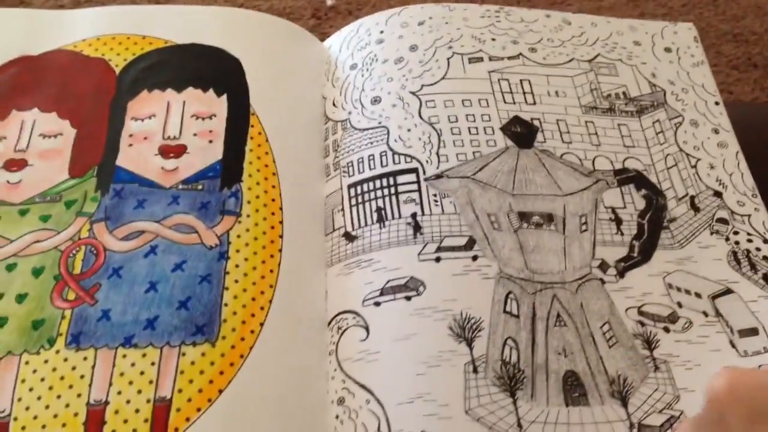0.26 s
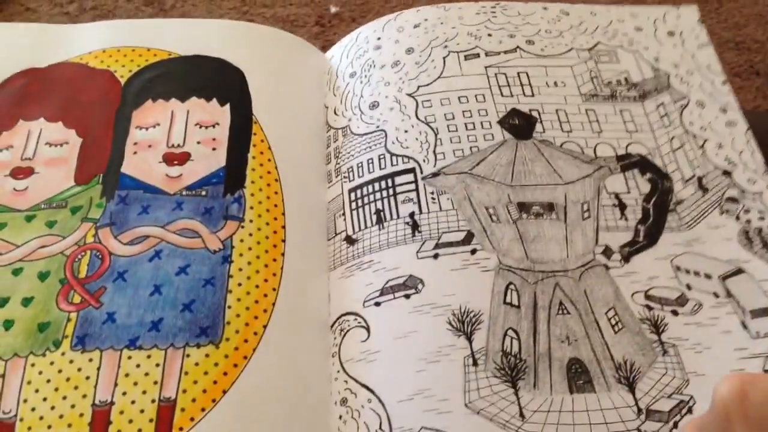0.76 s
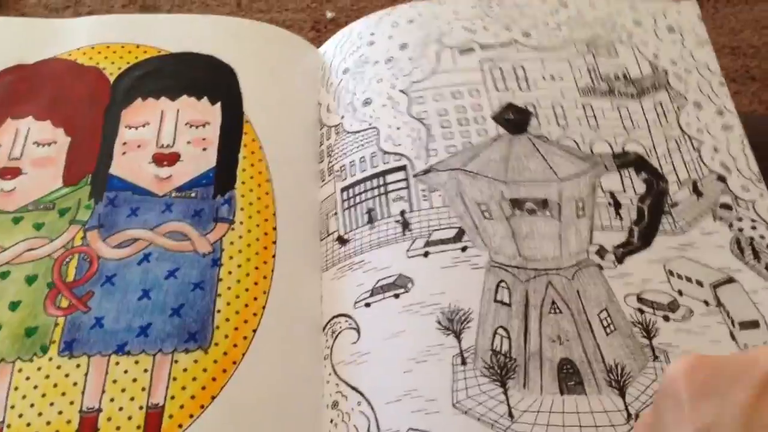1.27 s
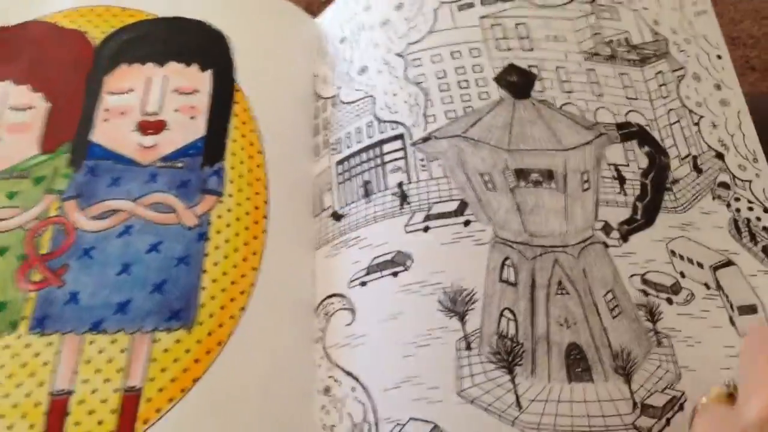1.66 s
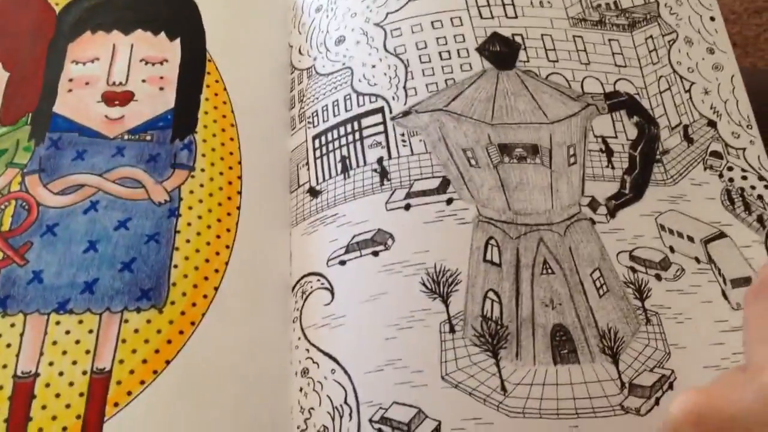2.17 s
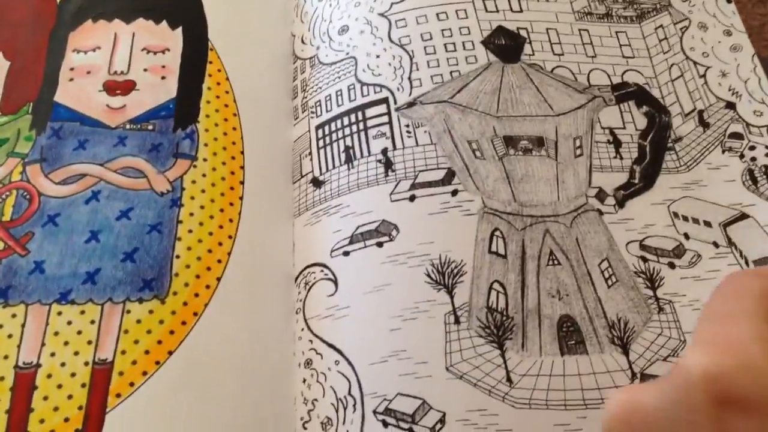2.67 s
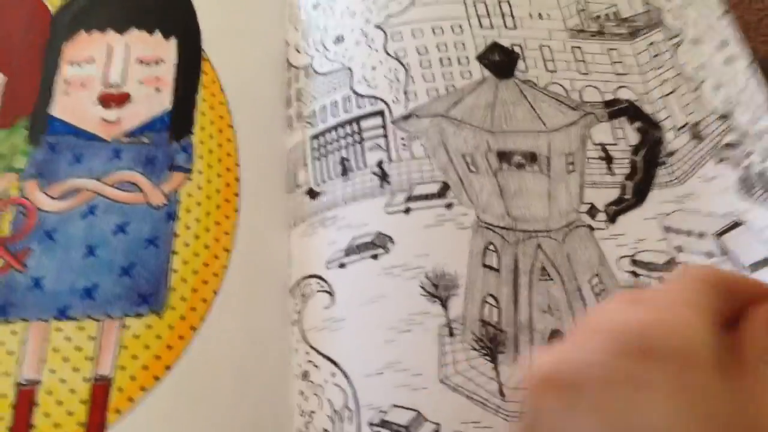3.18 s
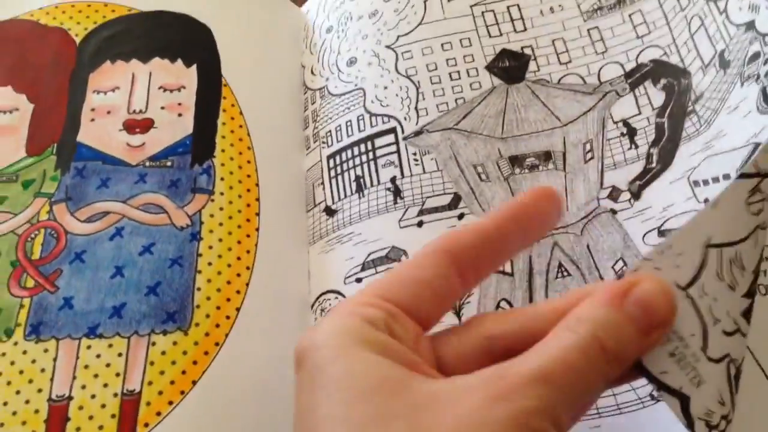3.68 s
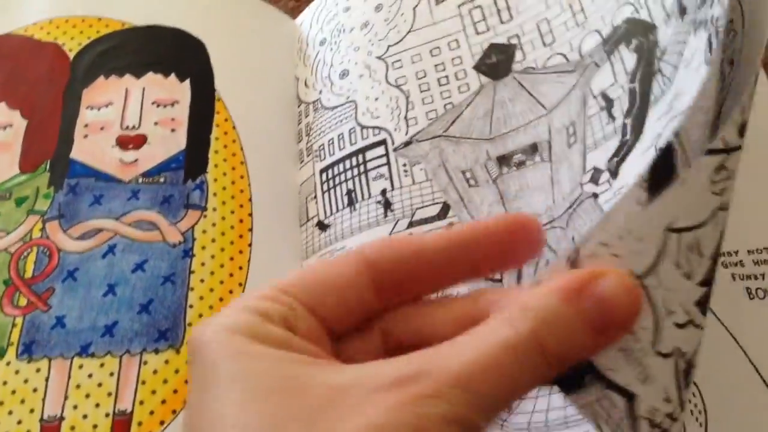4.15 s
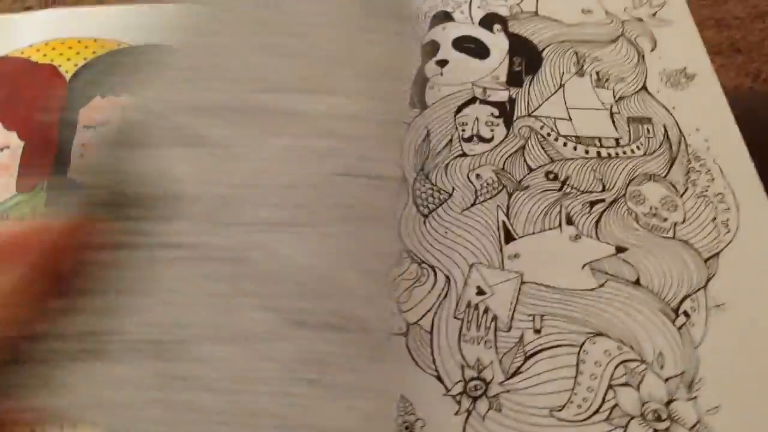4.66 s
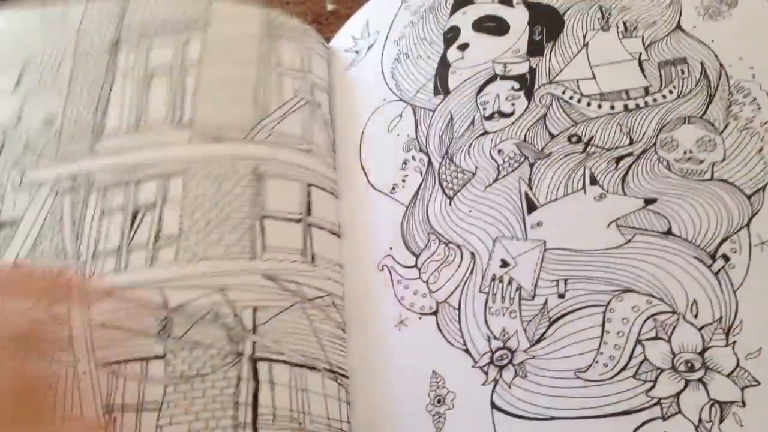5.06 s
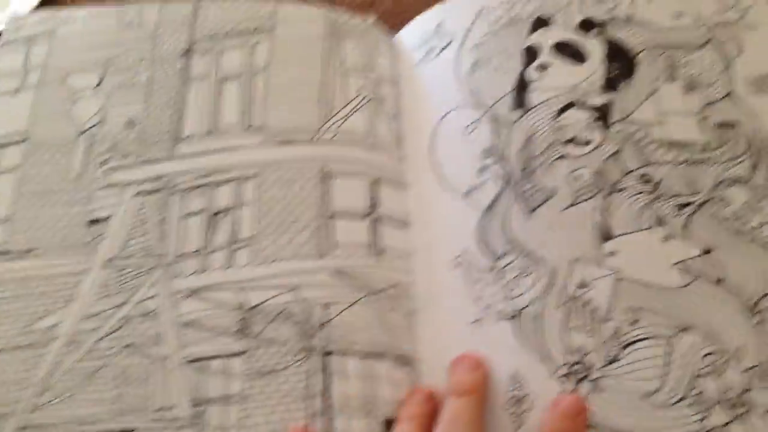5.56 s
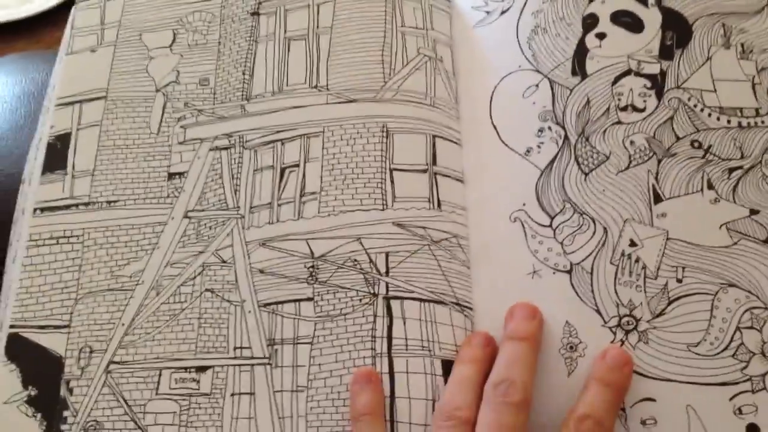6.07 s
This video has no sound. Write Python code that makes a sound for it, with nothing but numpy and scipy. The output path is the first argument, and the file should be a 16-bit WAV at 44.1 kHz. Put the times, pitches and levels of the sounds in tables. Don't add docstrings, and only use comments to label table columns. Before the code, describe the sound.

A large book handled close to a small microphone on a table in a quiet, lightly reflective room with low rumble, gentle hiss and a barely audible high whine. From 0.2 s stiff page edges snap from a thumb, faint and quick at first, swelling to separate crisp pops around 0.5-0.8 s, then fading by 1.05 s. From 1.2 to 2 s the hand shifts with small scrapes, a dull bump near 1.45 and three light snaps at 2.0. Bright corner picks tick at 2.35-2.75, then a strong pop at 2.84. Scrapes and a snap come near 3.2, soft flexing follows, and the sharpest peeling pop hits at 3.78. At 4.1-4.5 the page swings over in a dense crackle, swish and papery flutter. Afterwards only soft smoothing, a few ticks around 5.15 and 5.35, a faint knock at 5.67, a last tiny scrape at 6.08, and a distant low motor hum slowly swelling.

```python
import sys
import numpy as np
from scipy import signal
from scipy.fft import rfft, irfft
from scipy.io import wavfile
from scipy.ndimage import uniform_filter1d

SR = 44100
rng = np.random.default_rng(int(sys.argv[2]) if len(sys.argv) > 2 else 0)


def gain_from_db(level_db):
    decades = np.asarray(level_db, float) / 20
    return 10 ** decades


def unload_audio(sound):
    columns = np.transpose(np.atleast_2d(sound))
    steps = np.round(np.clip(columns, -1, 1) * 32767)
    wavfile.write(sys.argv[1], SR, steps.astype(np.int16))


N = 279153

# pitch_hz, width_hz, level_db
PAGE_MODES = [(776, 750, -0.5), (1480, 110, -0.5), (1960, 333, -0.5), (2570, 800, -2.5), (3900, 2800, 4),
              (6040, 1800, 0)]

# start_s, peak_db, ring_hz, edge_db
RIFFLE_SNAPS = [(0.035, -61, 515, -23), (0.22, -41, 2840, -25), (0.247, -34, 1920, -8),
                (0.273, -31.5, 720, -8.5), (0.2993, -24.5, 910, -21.5), (0.33, -21.5, 1430, -12),
                (0.365, -19.5, 1020, -6), (0.416, -16.5, 2850, -8), (0.5146, -13, 970, -10),
                (0.6257, -12.5, 2940, -8), (0.745, -11.5, 2700, -8), (0.7903, -15.5, 1400, -5.5),
                (0.852, -17.5, 1050, -6), (0.881, -22, 2690, -3.5), (0.913, -24.5, 3320, -2),
                (1.016, -29.5, 1360, -10), (1.055, -43, 3240, -1)]
# start_s, peak_db, ring_hz, edge_db
REGRIP_SNAPS = [(1.186, -45, 726, -11), (1.208, -44.5, 2660, 0), (1.217, -41.5, 790, -4),
                (1.257, -52.5, 1270, -9), (1.417, -39.5, 1500, -2), (1.4503, -51, 566, 8),
                (1.637, -42, 4030, -3), (1.859, -52, 2950, 11), (1.914, -45, 3800, 1),
                (2.0036, -30, 1530, -4), (2.032, -30, 1540, -4), (2.059, -30, 3560, -2)]
# start_s, peak_db, ring_hz, edge_db
PICK_SNAPS = [
    (2.249, -44.5, 3700, 5),
    (2.355, -31.5, 1330, -2.5),
    (2.392, -26.5, 4070, -4),
    (2.4583, -28.5, 3900, -1.5),
    (2.568, -49.5, 3880, -0.5),
    (2.62, -29, 3900, -1),
    (2.732, -31.5, 1780, -9.5),
    (2.741, -30, 1230, -17),
]
# start_s, peak_db, ring_hz, edge_db
LIFT_SNAPS = [ (2.843, -15.5, 1020, -5.5), (3.143, -52, 3380, 2), (3.157, -48, 2650, 6.5),
              (3.1768, -25.5, 1630, -1), (3.311, -48, 2960, -13), (3.555, -44.5, 1360, -28),
              (3.609, -39.5, 1630, -41), (3.631, -39, 2300, -38), (3.699, -33, 1510, -42),
              (3.708, -32, 1740, -39), (3.7824, -12, 865, -7.5), (3.874, -32.5, 1540, -3),
              (3.878, -23, 1650, -8), (3.966, -28.5, 1540, -25)]
# start_s, peak_db, ring_hz, edge_db
TURN_SNAPS = [(4.171, -26.5, 3130, -0.5), (4.189, -31, 4270, 3), (4.273, -19.5, 1350, -36),
              (4.286, -34, 1480, -13), (4.313, -30, 710, -32), (4.345, -33, 1080, -20),
              (4.373, -26, 1430, -5.5), (4.3975, -24, 1550, -6), (4.442, -42, 3300, -22),
              (5.143, -64, 3560, -10), (5.162, -44, 1350, -8), (5.17, -59, 1790, -16),
              (5.349, -50, 2220, -1.5), (5.371, -47, 530, -5.5), (5.672, -43, 774, -5),
              (6.058, -56, 880, -16), (6.073, -44.5, 860, -5)]

# pitch_hz, width_hz, level_db
STACK_RINGS = [(1530, 260, -3), (1920, 200, 0), (2800, 250, 2), (3820, 310, 5.5)]
CORNER_RINGS = [(1900, 200, 2), (2400, 76, 17.5), (3220, 210, 11), (3900, 220, 29)]
PEELED_RINGS = [(820, 270, 1.7), (1740, 360, 8.5), (2285, 127, 9), (3400, 520, 3.6)]
BENT_RINGS = [(1400, 130, -6), (1930, 300, -32), (3100, 92, -8), (4220, 390, -16)]

# snaps, rings, thump_db under a middling snap, ring_ms, lowest_hz, spike_db
GESTURES = [
    (RIFFLE_SNAPS, STACK_RINGS, -24, 18.4, 180, -11.5),
    (REGRIP_SNAPS, STACK_RINGS, -24.5, 17.3, 140, 0.85),
    (PICK_SNAPS, CORNER_RINGS, -32, 24.5, 890, -9.5),
    (LIFT_SNAPS, PEELED_RINGS, -32, 20.5, 550, -11.5),
    (TURN_SNAPS, BENT_RINGS, -26, 25.3, 230, -27)]

# start_s, peak_db, centre_hz, treble_db, length_ms
SEEKING_SCRAPES = [(0.395, -37, 1360, -25, 22), (0.397, -46, 4200, -20, 16), (0.446, -51, 3220, -25, 34),
                   (0.47, -51, 2600, -15, 46), (0.715, -51, 1470, -5, 30), (1.422, -36, 1960, 13, 17),
                   (1.514, -51, 1450, -12, 32), (1.607, -43, 4000, 5, 85), (1.642, -44, 2800, -15, 46),
                   (1.741, -44, 3700, 9.5, 40), (1.764, -49, 3570, -12, 28), (1.847, -42.5, 3880, -27, 36),
                   (1.927, -40.5, 4620, -8, 9.3), (3.181, -30.5, 1480, 9, 30.5),
                   (3.249, -51.5, 2570, 3, 120), (3.27, -53, 3900, 11, 33), (3.385, -47, 3180, 0, 43),
                   (3.41, -41.5, 4360, 9, 22), (3.505, -48.5, 7000, 13, 26), (3.47, -56, 4300, 5, 25),
                   (1.873, -50, 4500, 3, 18), (1.78, -51, 4200, 5, 30), (3.512, -49, 2940, -19, 14),
                   (3.585, -43.5, 1610, 0, 31)]
# start_s, peak_db, centre_hz, treble_db, length_ms
SWINGING_SCRAPES = [(4.091, -31.5, 3050, 2, 42), (4.19, -25, 4400, -1, 30), (4.214, -36, 3100, -19, 115),
                    (4.244, -32, 4070, -12, 53), (4.293, -32.5, 4600, 12, 36),
                    (4.403, -37.5, 3100, -20, 54), (4.422, -34, 3300, -8, 19), (4.499, -61, 3800, -20, 33),
                    (4.748, -53, 2140, -19, 67), (4.93, -49.5, 4100, 2, 60), (5.02, -52.5, 2800, 7, 97),
                    (5.38, -50, 4020, -8, 30), (6.081, -49, 3800, 14.5, 40)]
# start_s, peak_db, centre_hz, treble_db, length_ms
RUFFLES = [(.5955, -30, 1100, -15, 3.7), (3.172, -40, 2600, -5, 5), (2.057, -43, 3000, -10, 3),
           (0.482, -56, 3260, -9, 7.6), (1.03, -29, 2200, -8, 6.1), (2.255, -34.5, 3870, -3, 8.8),
           (2.354, -34, 1240, 5.5, 15), (2.3955, -33, 3900, -9, 6.5), (2.4665, -30.5, 3600, -4, 7.6),
           (2.624, -29.5, 2400, -2, 8.5), (2.737, -31, 1200, 4, 5.9), (3.102, -42, 2650, -1, 13),
           (3.607, -34, 1620, 5.5, 10.6), (3.644, -36.5, 2300, -16, 7.4), (3.702, -35, 1600, -22, 12.1),
           (3.967, -26.5, 1580, -23, 7), (4.076, -35, 3850, -16, 14), (4.132, -26, 2780, 2.5, 13),
           (4.171, -25.5, 2920, 1, 13), (4.343, -27.5, 3220, -4, 7.3), (4.4405, -16.5, 3900, -10, 5.7),
           (4.453, -28, 3800, -10, 8.6), (4.479, -32, 3750, -12, 7.2), (2.047, -34, 1500, -10, 5.6),
           (5.099, -42.5, 4500, 4, 20), (5.143, -37, 3600, -17, 4.2), (5.162, -37, 1280, 0, 5.6),
           (1.432, -27.5, 5230, -8, 7.9), (3.788, -32, 2200, -18, 3.5), (4.445, -26, 2970, -12, 14),
           (0.446, -38, 3400, -15, 6), (0.757, -44, 2700, -20, 8.2), (2.616, -43, 3900, -10, 4),
           (0.7165, -39, 2500, -6, 4), (4.43, -31, 4000, -2, 8), (4.437, -20, 3500, -6, 5),
           (3.425, -40, 1690, -5, 9.3), (3.54, -53, 1210, -15, 4)]

# start_s, length_s, from_hz, to_hz, level_db
GAP_WHISTLES = [(3.262, 0.0516, 3750, 3950, -56.5), (4.187, 0.11, 4500, 3900, -48),
                (4.2, 0.073, 1650, 1600, -51.5), (4.455, .1, 3900, 3600, -63),
                (4.47, .085, 5600, 5300, -68), (3.275, 0.028, 9600, 9200, -65),
                (3.178, .02, 9200, 8600, -52), (4.4, 0.031, 3100, 3200, -55),
                (4.436, 0.01, 3300, 3450, -36.5), (4.437, .01, 3700, 4400, -41.5),
                (4.447, .02, 3600, 3000, -48.5), (4.8, 0.02, 2800, 650, -59),
                (4.489, 0.081, 1000, 470, -62.5), (4.1, 0.14, 1800, 4600, -74),
                (4.739, 0.139, 420, 820, -73), (.468, 0.042, 3350, 3230, -50),
                (.45, 0.071, 2500, 2400, -55), (6.075, 0.047, 710, 890, -62.5),
                (4.19, 0.083, 6900, 4700, -62), (4.293, 0.029, 7400, 5600, -52),
                (4.19, 0.08, 4300, 3000, -62), (1.74, 0.13, 5800, 4300, -65),
                (4.095, 0.035, 2100, 2800, -49)]
# start_s, length_s, from_hz, to_hz, level_db
EDGE_SINGING = [
    (1.649, 0.06, 1090, 1077, -68),
    (1.481, 0.15, 2700, 2830, -69.5),
    (1.634, 0.04, 4050, 4170, -66),
    (1.642, 0.1, 2850, 2780, -72),
    (3.196, 0.16, 2700, 2490, -67),
    (3.618, 0.21, 2830, 2490, -70),
    (3.8, 0.119, 2750, 2930, -69),
    (4.91, .07, 3780, 4100, -69),
]
# start_s, peak_db
TICKS = [(.2225, -60), (.2485, -53), (.2745, -42), (.3005, -43), (0.332, -43), (2.0048, -45), (2.0332, -45),
         (3.1432, -59), (3.1578, -52), (3.556, -49), (4.481, -52), (1.9145, -49), (0.3665, -54),
         (0.516, -53), (0.748, -44), (0.791, -45), (0.853, -52), (3.7827, -32), (3.879, -36.5),
         (0.883, -42), (0.9145, -43), (1.0165, -42), (1.031, -49), (1.056, -51), (1.217, -45.5),
         (0.417, -38), (0.6264, -46), (1.4304, -59), (2.0595, -39), (2.8428, -41), (3.178, -31),
         (3.966, -39), (4.1714, -36), (4.1934, -41), (4.344, -41), (4.373, -46), (4.398, -39), (4.44, -35),
         (5.1018, -44), (5.1628, -38), (5.171, -46), (5.35, -45)]

# time_s, effort_db, breadth_db (palm high, fingertip low)
HAND = [(0, -61.5, -7.5), (.28, -62, -11.5), (.43, -68.5, 9), (.72, -65.5, 0.5), (.9, -66.5, -14),
        (1.6, -67, -1), (1.87, -61.5, -13.5), (2.2, -70, -6.5), (2.95, -79.5, 3.5), (3.2, -60, -12.5),
        (3.36, -66, -6.5), (3.77, -62, -9.5), (4.11, -68.5, -1), (4.48, -60.5, -30), (4.58, -72, -6.5),
        (4.97, -62.5, -3.5), (5.29, -77.5, 2.5), (6.33, -68.5, -7)]
# top_s, level_db, rise_and_fall_s
DRAGS = [
    (.49, -55, 0.15),
    (.58, -74, 0.091),
    (3.51, -66, 0.17),
    (4.285, -52, 0.018),
    (4.41, -53, 0.026),
]
# top_s, level_db, rise_and_fall_s
FLICKS = [
    (4.25, -50, 0.052),
    (4.47, -62, 0.11),
    (3.3, -70, .08),
    (4.2, -68, .1),
    (4.4, -66, .12),
]
# top_s, level_db, rise_and_fall_s
SWISHES = [
    (.04, -63.5, 0.21),
    (.15, -68, 0.18),
    (4.215, -55, 0.091),
    (4.41, -63, 0.054),
    (4.97, -74, 0.16),
]
# top_s, level_db, rise_and_fall_s
BUMPS = [
    (.4, -59, 0.078),
    (.56, -61, 0.14),
    (.88, -59, 0.13),
    (1.455, -60.5, 0.064),
    (4.34, -58, 0.059),
    (4.48, -57, 0.14),
    (5.85, -70, 1),
]
ROOM_BANDS_DB = [-77, -68.5, -69, -73.5]

# start_s, peak_db, centre_hz
KNOCKS = [(0.034, -43, 485), (.803, -45, 404), (1.016, -45.5, 680), (1.452, -39.5, 385),
          (2.619, -49.5, 205), (2.843, -43.5, 167), (3.176, -46, 615), (3.7925, -42, 870),
          (3.878, -48.5, 172), (3.9665, -35.5, 740), (5.672, -48, 332), (1.443, -46, 230),
          (1.448, -44, 310), (0.273, -46, 240), (0.624, -44.5, 227)]
# pitch_hz, density_db (per Hz)
ROOM_TONE = [(13, -69), (22, -34), (53, -2.5), (124, -5), (172, 1.5), (360, -13), (755, -17), (1820, -21.5),
             (2390, -15.5), (4250, -14), (14200, -18.5), (15400, -17.5)]


def noise(count):
    return rng.standard_normal(count)


def level(x, db):
    return x * gain_from_db(db) / np.sqrt(np.mean(x ** 2))


def peak(x, db):
    return gain_from_db(db) * x / np.abs(x).max()


def ring(x, hz, width_hz):
    return signal.lfilter(*signal.iirpeak(hz, hz / width_hz, fs=SR), x)


def band(x, lo_hz, hi_hz, order=2):
    edges = [lo_hz, min(hi_hz, .45 * SR)]
    return signal.sosfilt(signal.butter(order, edges, "band", fs=SR, output="sos"), x)


def even(x, lo_hz, hi_hz):
    return signal.sosfiltfilt(signal.butter(1, [lo_hz, hi_hz], "band", fs=SR, output="sos"), x)


def walk(rate_hz):
    k = int(SR / rate_hz)
    held = np.repeat(noise(N // k + 1), k)
    return 1.3 * uniform_filter1d(uniform_filter1d(held, k), k)[:N]


def swells(rows):
    t = np.arange(N) / SR
    return sum(gain_from_db(db) * np.maximum(1 - np.abs(t - s) / max(span, .01), 0) ** 2 for s, db, span in rows)


def add(out, s, x):
    i = int(s * SR)
    out[i:i + len(x)] += x[:N - i]


def page(x, stretch=1):
    return sum(gain_from_db(db) * ring(x, hz * stretch, width) for hz, width, db in PAGE_MODES)


def slips(count, scatter_db):
    sizes = uniform_filter1d(rng.exponential(size=count), size=6)
    return level(noise(count) * gain_from_db(scatter_db * sizes), 0)


def snap(t, hz, edge_db, rings, thump_db, ring_s, low_hz, spike_db):
    push_s, table_echo_s, edge_lag_s = .0013, .0008, .0004
    after = np.maximum(t, 0)
    before = np.minimum(t, 0)
    creak = .04 * np.exp(before / 0.0059) + 0.27 * np.exp(before / 0.00071)
    shake = slips(len(t), 2.0) * gain_from_db(-60 * after / ring_s) * np.clip(creak + after / .0016, 0, 1)

    bounce_s = max(round(hz * table_echo_s), 1) / hz
    push = np.exp(-((t - push_s) / .00009) ** 2)
    push = push + 0.23 * np.exp(-((t - push_s - bounce_s) / .0001) ** 2)

    drive = .5 * push + 0.3 * (ring_s / 0.012) * shake
    flutter = page(drive, 1 + .06 * rng.standard_normal()) + .8 * ring(drive, hz, 560)
    bend = 1 + .03 * rng.standard_normal()
    rung = sum(gain_from_db(db) * ring(1.5 * push + drive, f_hz * bend, width) for f_hz, width, db in rings)
    body = 0.78 * push + 1.4 * flutter + rung

    edge = np.roll(body + 0.94 * rung, int(edge_lag_s * SR))
    crack = band(drive, 7300, 9100, order=1)
    thump = band(noise(len(t)), 133, 340) * (after / .0028) * np.exp(1 - after / 0.0032)
    click = np.exp(-((t - push_s) / .00005) ** 2)
    return (peak(even(even(body, 260, 6440), low_hz, 2230), -3)
            + peak(even(edge, 2470, 5050), edge_db - 0.5)
            + peak(crack, edge_db - 24.5)
            + peak(thump, thump_db + 3.5)
            + peak(even(click, 900, 12000), spike_db))


def snaps():
    middling_db, thump_slope, ring_ms_per_db = -31, -0.42, -0.17
    out, lead_s = np.zeros(N), .014
    t = np.arange(2900) / SR - lead_s
    for rows, rings, thump_db, ring_ms, low_hz, spike_db in GESTURES:
        for s, db, hz, edge_db in rows:
            harder_db = db - middling_db
            ring_s = max(ring_ms + ring_ms_per_db * harder_db, 3) / 1000
            soft_db = thump_db + thump_slope * harder_db
            add(out, s - lead_s, gain_from_db(db) * snap(t, hz, edge_db, rings, soft_db, ring_s, low_hz, spike_db))
    return out


def scrapes():
    out, t = np.zeros(N), np.arange(6600) / SR
    kinds = (SEEKING_SCRAPES, 0.51), (SWINGING_SCRAPES, 0.28), (RUFFLES, 0.19)
    for s, db, hz, treble_db, ms, low in [(*row, low) for rows, low in kinds for row in rows]:
        catch_ms = 1.6 + 0.039 * ms
        along = t / (max(ms, 4) / 1000)
        catch = np.minimum(t / (max(catch_ms, .5) / 1000), 1)
        stroke = catch * np.exp(-.7 * along) / (1 + along ** 6)
        rub = slips(len(t), 4.0)
        sheet = band(page(rub, 1 + 0.15 * rng.standard_normal()), low * hz, 6200)
        body = level(sheet, 1.8) + level(ring(rub, hz, 0.072 * hz), -4.0)
        treble = level(band(rub, 4580, 9050), treble_db - 7.0)
        air = level(band(rub, 8200, 14000), treble_db - 23.0)
        add(out, s, gain_from_db(db - 18.0) * stroke * (body + treble + air))
    return out


def whistles():
    out = np.zeros(N)
    rows = [(*row, 330 + 0.097 * row[2]) for row in GAP_WHISTLES]
    rows += [(*row, 110) for row in EDGE_SINGING]
    for s, length_s, from_hz, to_hz, db, width_hz in rows:
        air = uniform_filter1d(noise((2, 6600)), int(SR / max(width_hz, 50)))[:, :int(length_s * SR)]
        along = np.linspace(0, 1, air.shape[1])
        phase = 2 * np.pi * np.cumsum(from_hz + (to_hz - from_hz) * along) / SR
        breath = air[0] * np.cos(phase) + air[1] * np.sin(phase)
        add(out, s, level(breath, db) * np.sin(np.pi * along) ** .5)
    return out


def ticks():
    out, t = np.zeros(N), np.arange(400) / SR
    for s, db in TICKS:
        tick = band(noise(len(t)) * np.exp(-t / 0.0015), 5400, 11500)
        add(out, s, peak(tick, db - 4.5))
    return out


def slide():
    hiss_db, hiss_share, rumble_db = -69, 0.18, -70
    s, *controls = np.transpose(HAND)
    effort, breadth = (np.interp(np.arange(N) / SR, s, c) for c in controls)
    fibres = 3 * noise(N) * (rng.random(N) < 120 / SR)
    rub = slips(N, 3.0) + fibres
    sheet = page(rub) + .25 * rub
    grip_db = 2.0 * walk(40)

    body = band(sheet, 373, 2300)
    edge = band(sheet, 2000, 4800, order=1)
    hiss = band(rub, 3830, 11300)
    rumble = ring(noise(N), 189, 100) + ring(noise(N), 76.6, 27.7)
    voices = [(body, effort + breadth, DRAGS), (edge, effort, FLICKS),
              (hiss, hiss_db + hiss_share * (effort - hiss_db), SWISHES), (rumble, rumble_db, BUMPS)]
    out = 0
    for (voice, steady_db, extra), quiet_db in zip(voices, ROOM_BANDS_DB):
        heard = np.hypot(gain_from_db(steady_db), swells(extra))
        above_room = np.sqrt(np.maximum(heard ** 2 - gain_from_db(quiet_db) ** 2, 0))
        out = out + level(voice, 0) * above_room * gain_from_db(grip_db + 2.0 * walk(24.98))
    return out


def knocks():
    out, t = np.zeros(N), np.arange(3000) / SR
    tone_share, cycles = 0.45, 0.99
    for s, db, hz in KNOCKS:
        along = t * hz / cycles
        dull = level(band(noise(len(t)), 0.88 * hz, 1.1 * hz, order=1), 0)
        swing = tone_share * np.sin(2 * np.pi * hz * t) + (1 - tone_share) * dull
        add(out, s, peak(swing * along * np.exp(-along), db))
    return out


def room(x):
    t60_s, wet_db, top_hz = 0.29, -22.5, 4600
    t = np.arange(int(.5 * SR)) / SR
    clumps = gain_from_db(1.5 * walk(260)[:len(t)])
    wash = band(noise(len(t)) * clumps, 110, top_hz)
    wash = wash * gain_from_db(-60 * t / t60_s) * np.minimum(t / 0.0028, 1)
    return signal.fftconvolve(x, gain_from_db(wet_db) * wash / np.sqrt(np.sum(wash ** 2)))[:N]


def drone():
    top_s, top_db, rise_s = 6.38, -67.5, 1.9
    return level(ring(noise(N), 73, 9.9), 0) * swells([(top_s, top_db, rise_s)])


def room_tone():
    tone_db, whine_hz, whine_db = -66, 15000, -88
    hz, db = np.transpose(ROOM_TONE)
    bins_hz = np.arange(1, N // 2 + 2) * SR / N
    tone = irfft(rfft(noise(N)) * gain_from_db(np.interp(np.log(bins_hz), np.log(hz), db)), N)
    whine = np.sqrt(2) * gain_from_db(whine_db) * np.sin(2 * np.pi * whine_hz * np.arange(N) / SR)
    return level(tone * gain_from_db(.5 * walk(0.93)), tone_db) + whine


def scene():
    paper = snaps() + scrapes() + whistles() + ticks()
    paper = paper - 0.25 * ring(paper, 2300, 720)
    return (paper + room(paper) + slide() + room_tone() + knocks() + drone())[None]


def band_limit(x):
    return signal.sosfilt(signal.butter(12, 16340, fs=SR, output="sos"), x)


def record(dry):
    top_hz = 15280
    mix = signal.sosfilt(signal.ellip(10, .2, 70, top_hz, fs=SR, output="sos"), dry)
    return band_limit(mix)


dry = scene()
out = record(dry)
unload_audio(out)
```